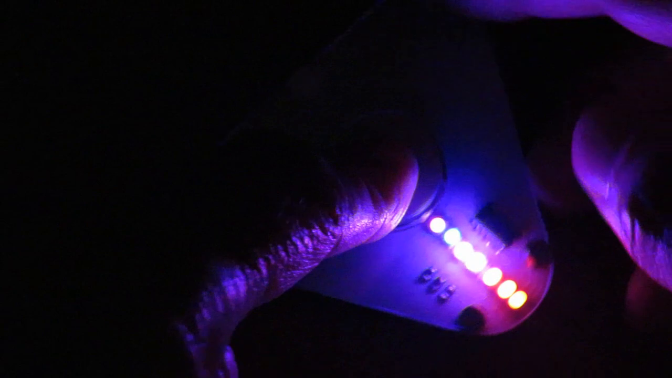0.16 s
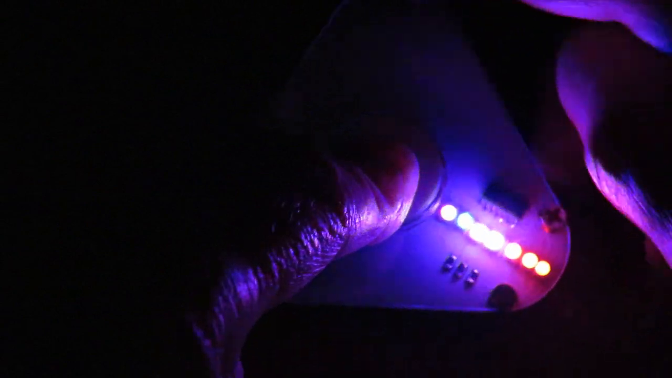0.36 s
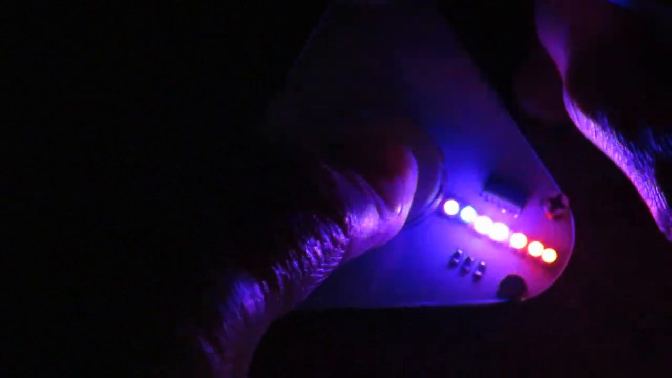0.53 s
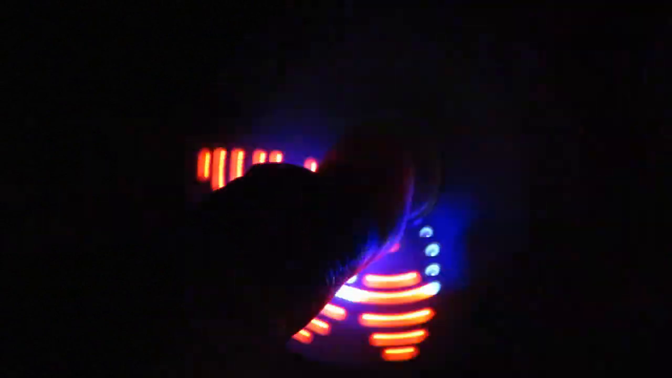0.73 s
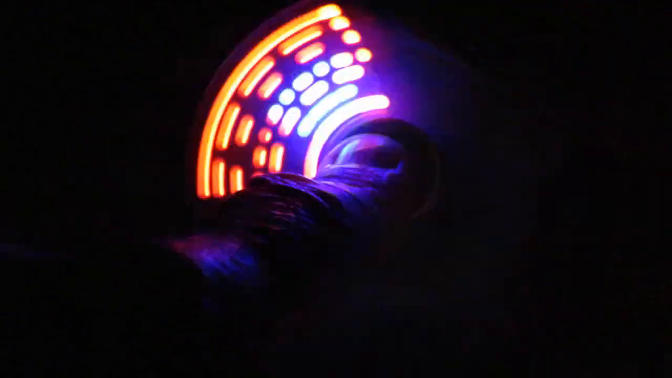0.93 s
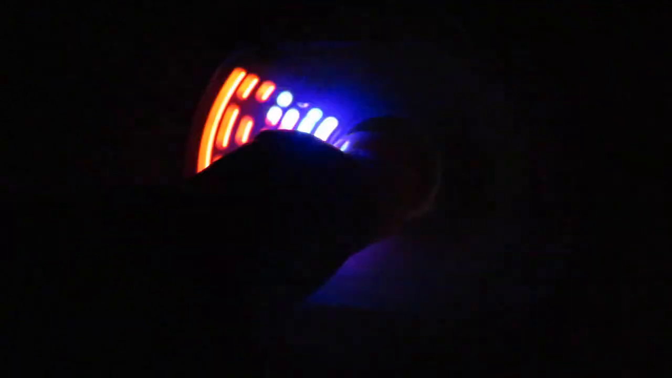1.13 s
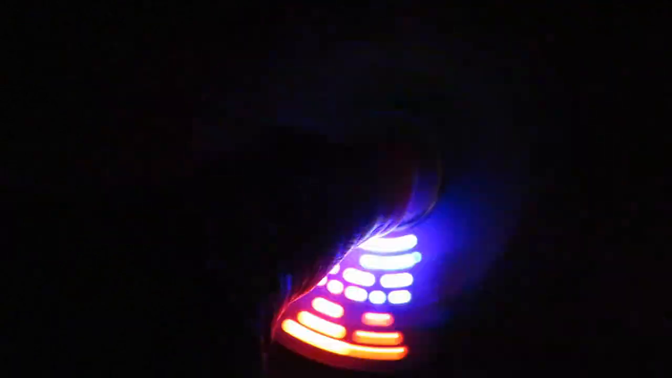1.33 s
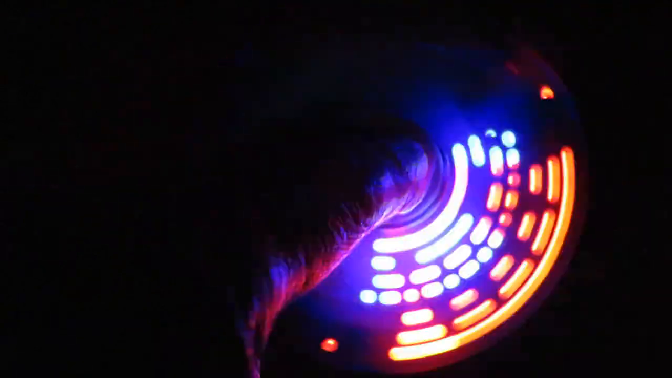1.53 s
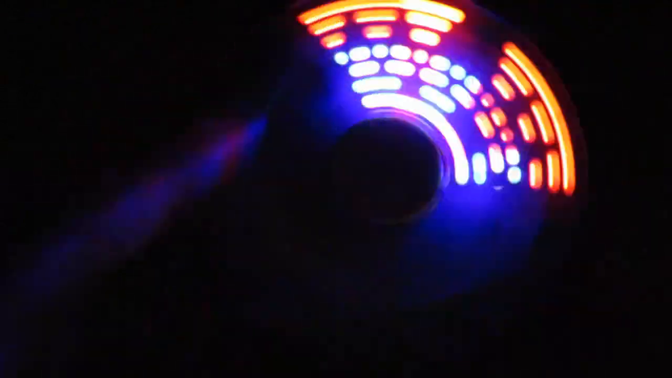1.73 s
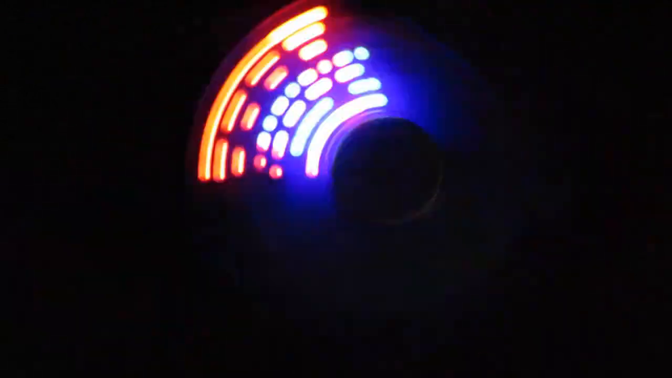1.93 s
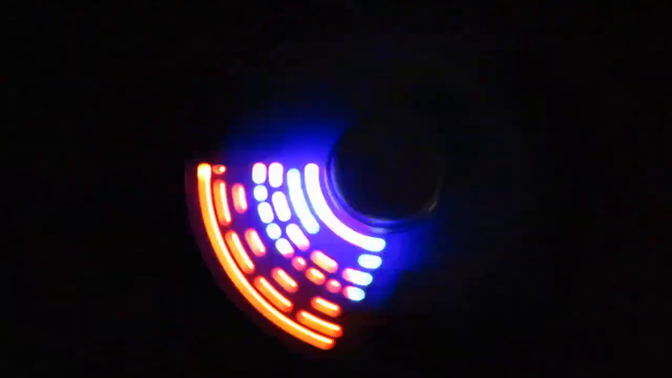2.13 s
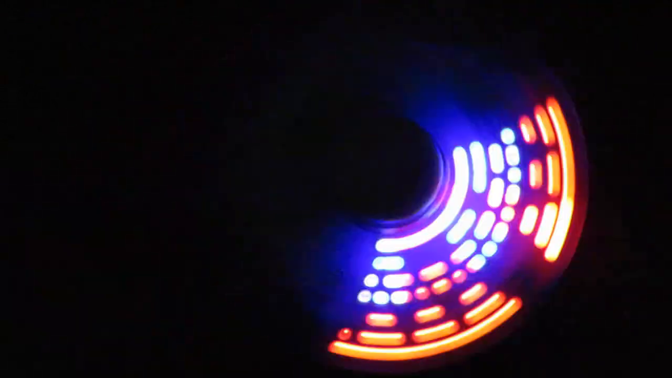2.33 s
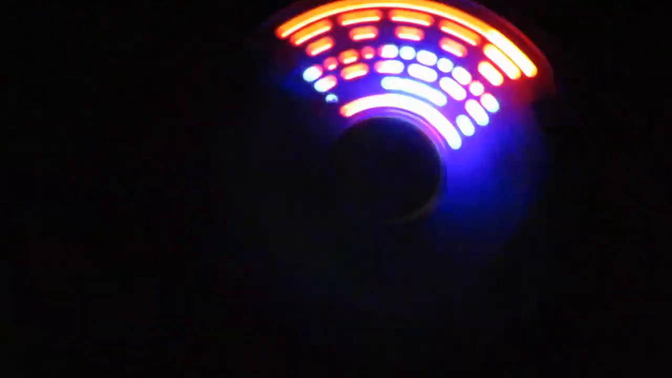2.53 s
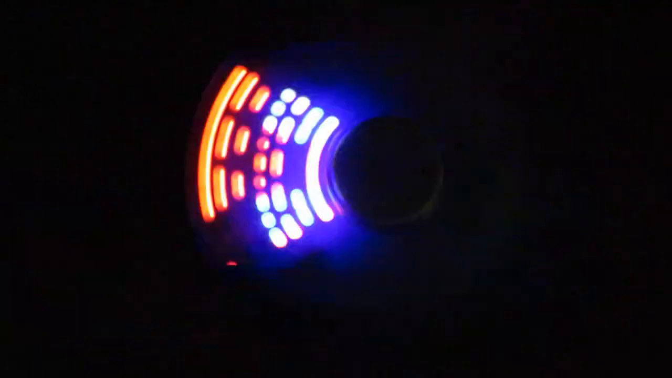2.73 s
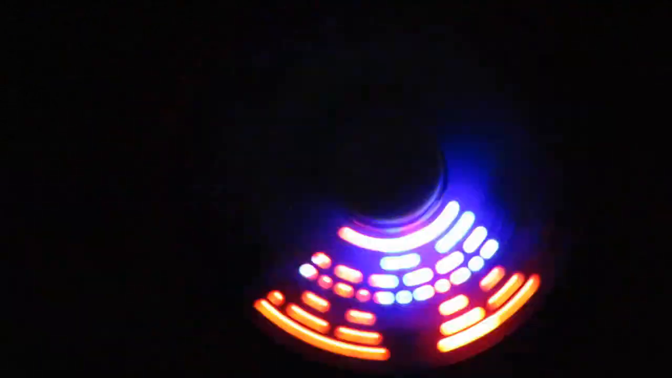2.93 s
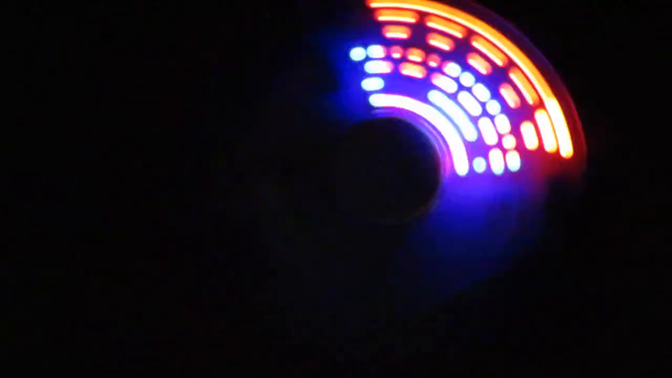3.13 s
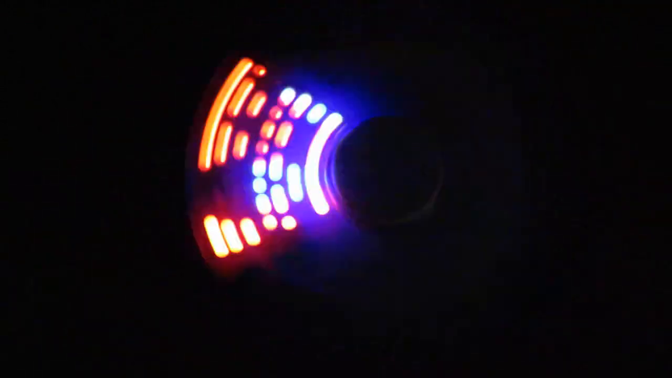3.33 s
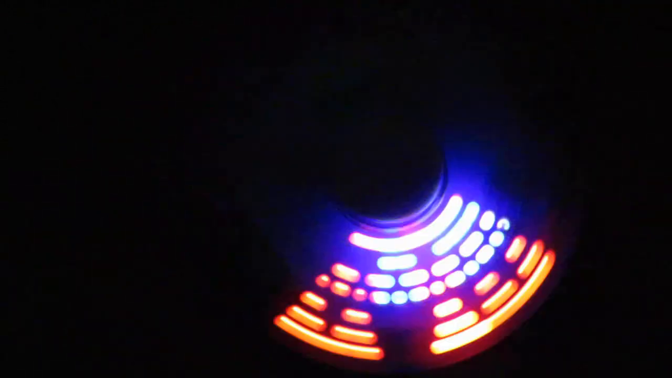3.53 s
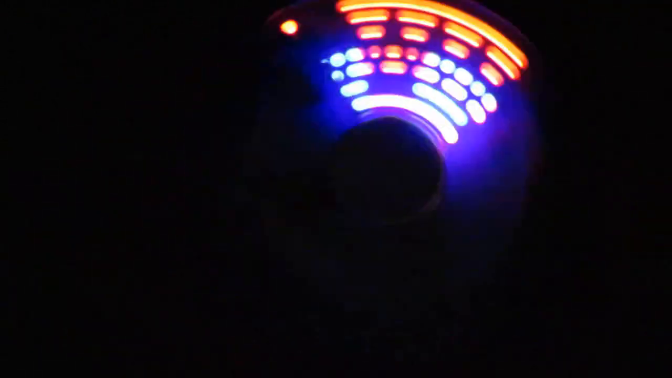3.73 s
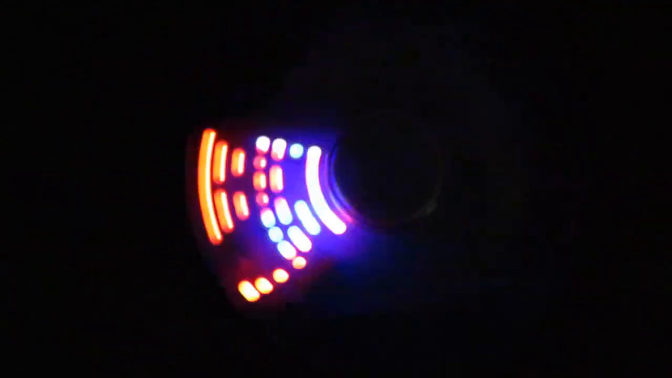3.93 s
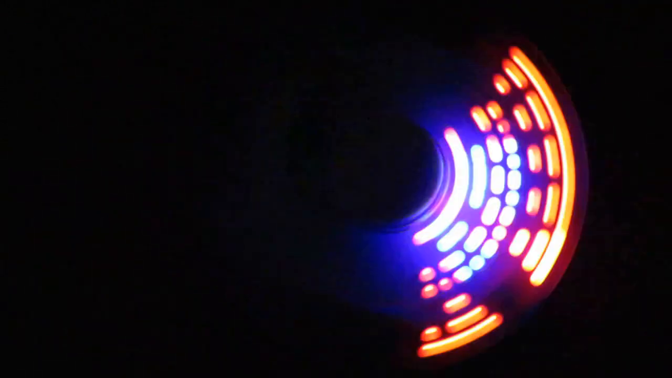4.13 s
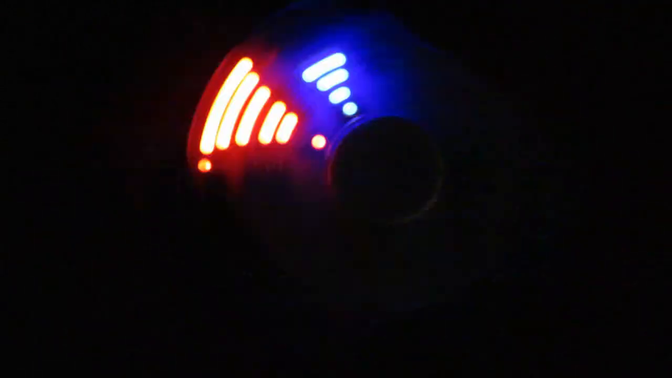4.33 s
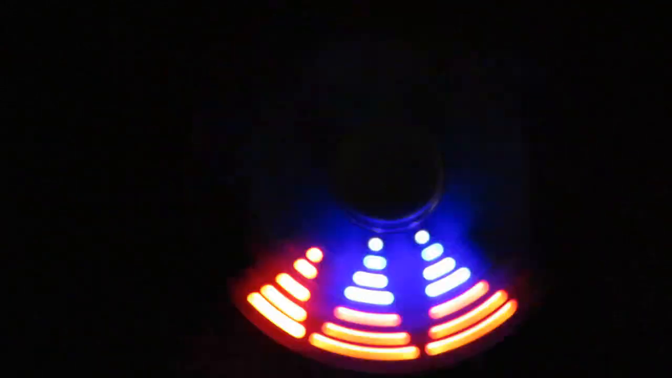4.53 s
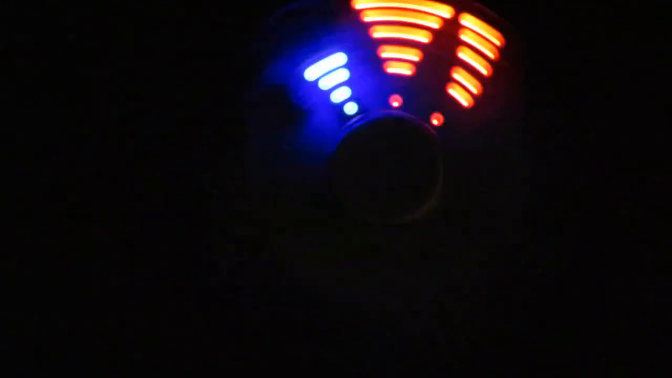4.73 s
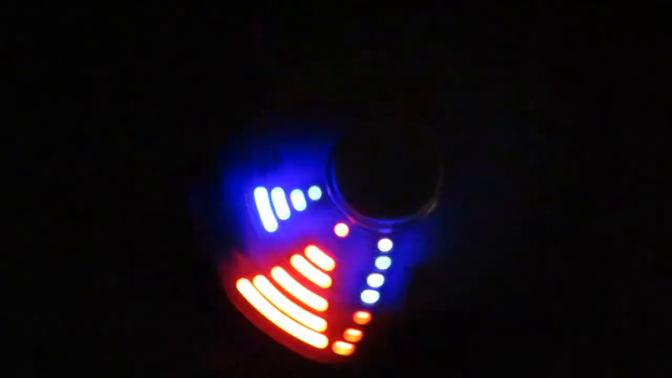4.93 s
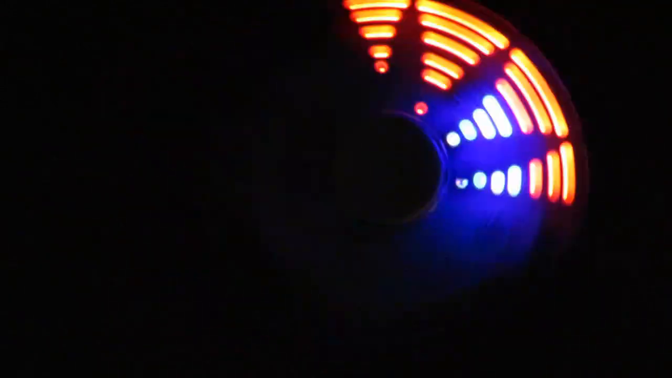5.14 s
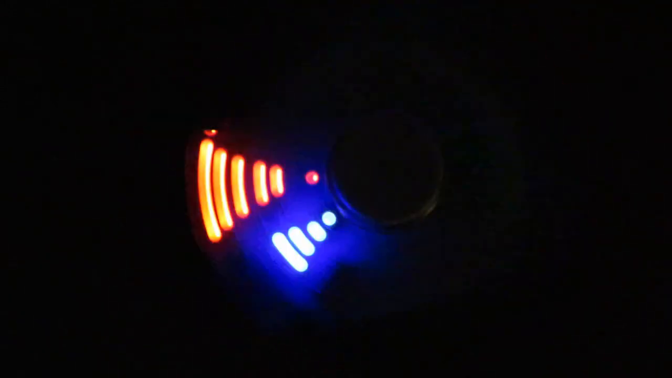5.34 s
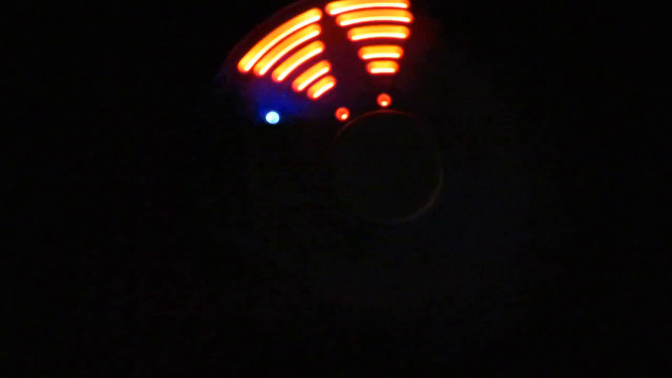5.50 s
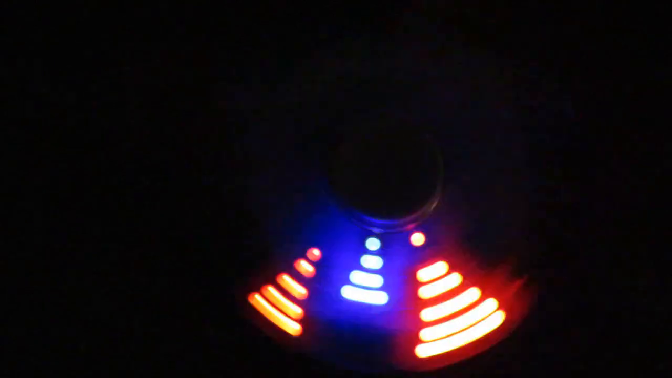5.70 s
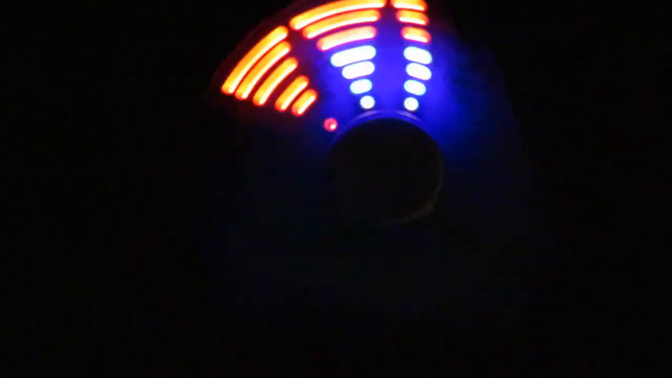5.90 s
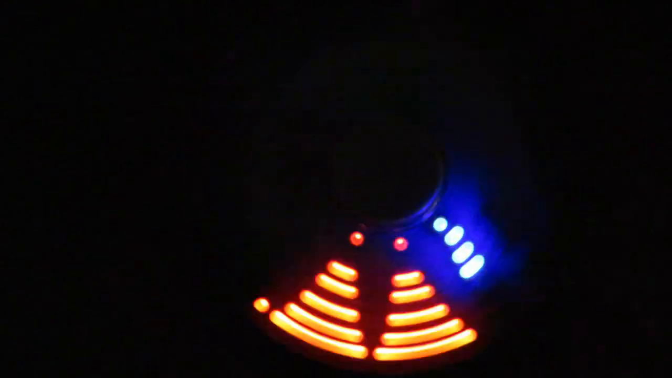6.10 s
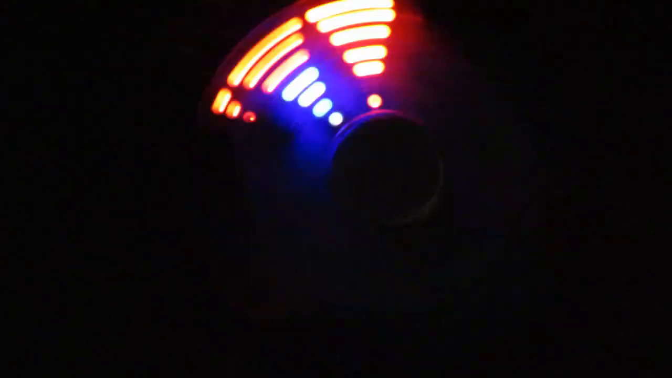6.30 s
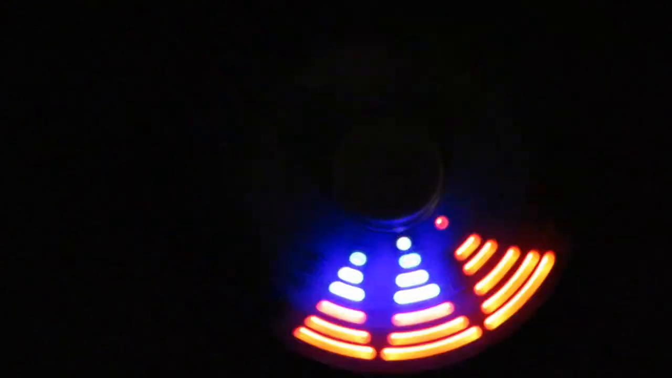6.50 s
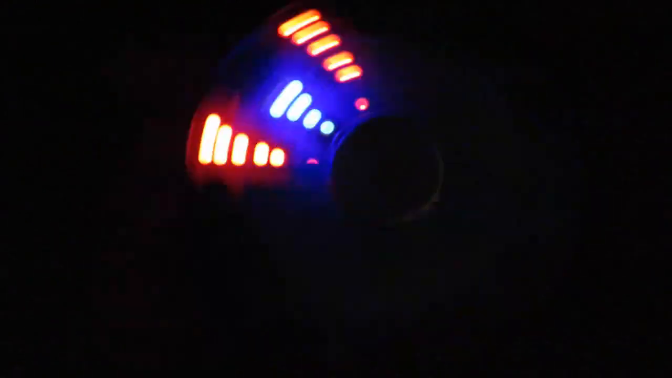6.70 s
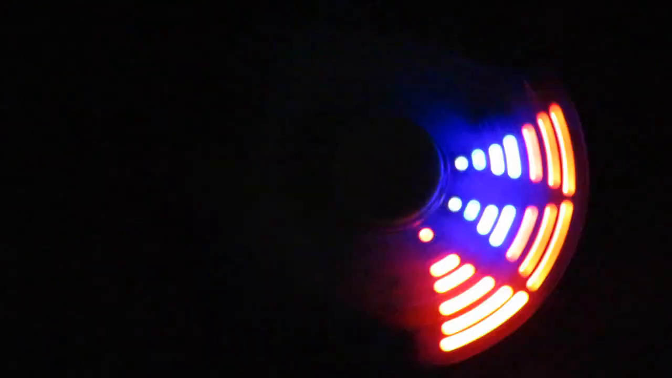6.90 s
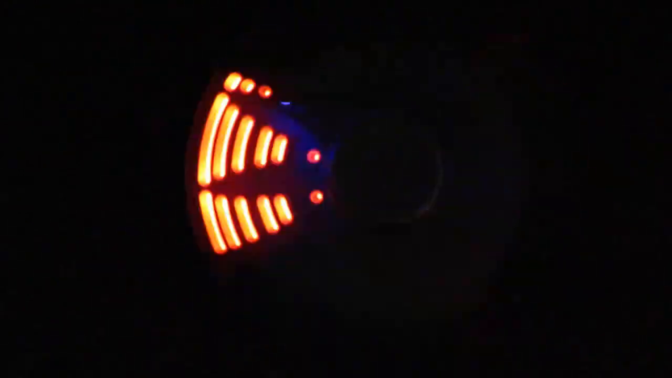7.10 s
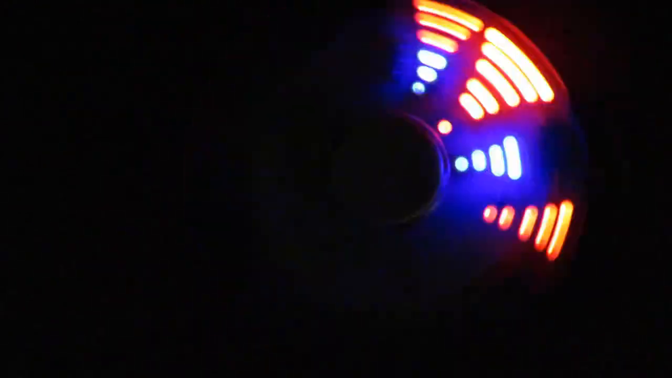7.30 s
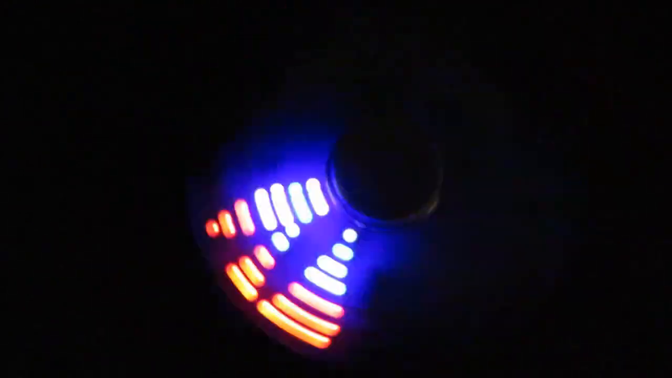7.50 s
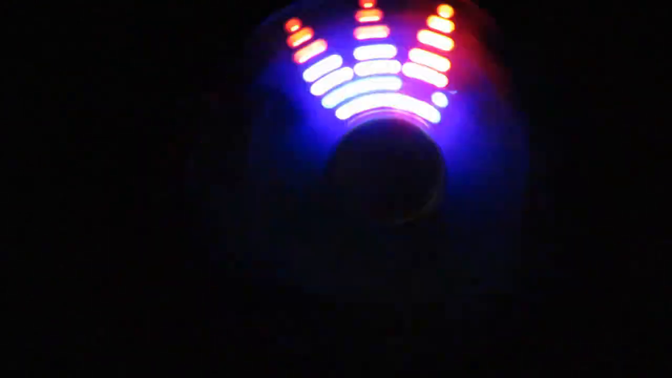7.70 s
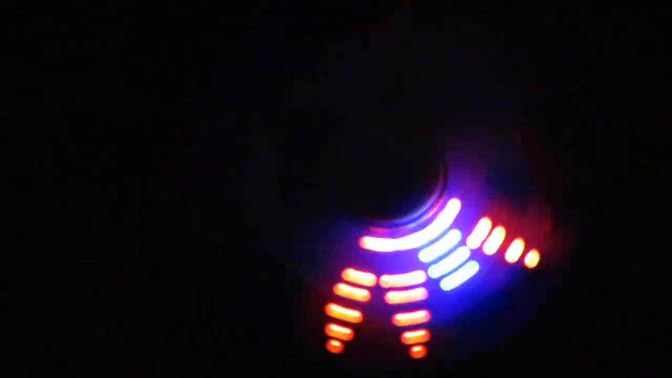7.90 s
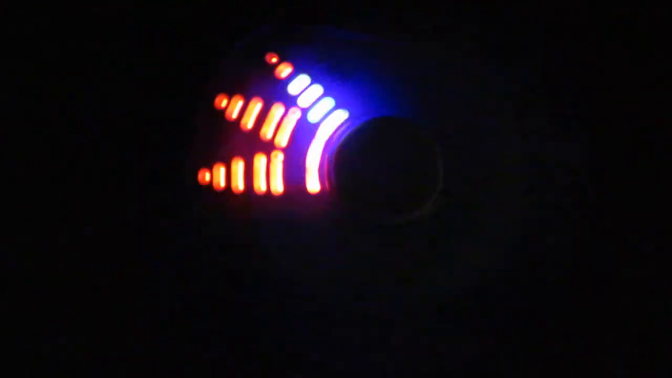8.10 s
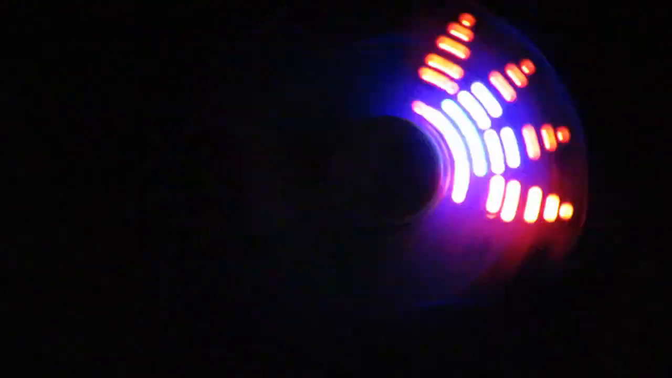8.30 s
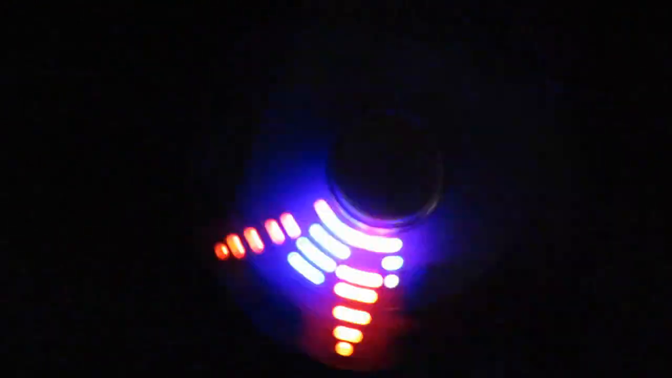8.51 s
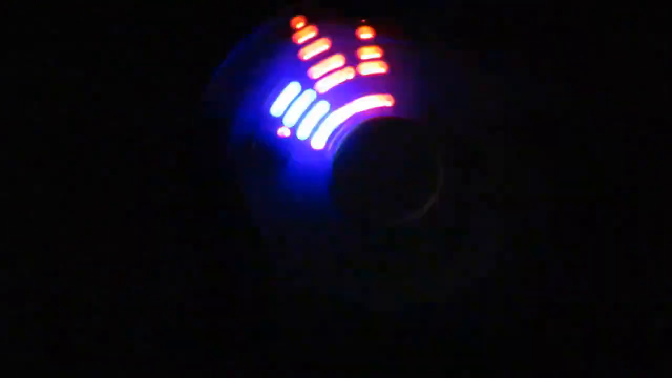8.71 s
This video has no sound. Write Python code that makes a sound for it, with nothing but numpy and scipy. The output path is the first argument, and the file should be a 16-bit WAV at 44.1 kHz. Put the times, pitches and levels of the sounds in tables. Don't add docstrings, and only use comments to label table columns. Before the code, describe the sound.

After almost a second of faint room hum, a fingernail flicks a light bearing spinner, which rattles and whirs steadily with tiny clicks, gradually fading.

```python
import sys
import numpy as np
from scipy import signal
from scipy.fft import rfft, irfft
from scipy.io import wavfile

SR = 44100
rng = np.random.default_rng(int(sys.argv[2]) if len(sys.argv) > 2 else 0)


def dump(signal):
    limited = np.clip(np.atleast_2d(signal).T, -1, 1)
    pcm = np.round(limited * 32767).astype(np.int16)
    wavfile.write(sys.argv[1], SR, pcm)


def attenuation_scalar(level_db):
    decades = np.asarray(level_db, float) / 20
    return 10 ** decades


N = 385875
T = np.arange(N) / SR
HZ = np.maximum(np.fft.rfftfreq(N, 1 / SR), 1)

# frequency in Hz, level in dB per Hz.
RUMBLE = [(12, -37), (20, -10), (54, -6.5), (76, -5), (107, -1), (200, -0.5), (260, -19), (440, -120)]
# frequency in Hz, level in dB per Hz.
ROOM_AIR = [(120, -29), (200, -12.5), (320, -11.5), (440, -18), (700, -8.5), (900, -15.5), (1400, -18.5),
            (2500, -24), (5000, -30.5), (8000, -37), (12500, -41.5), (13200, -46), (15300, -41)]
# frequency in Hz, width in Hz, level in dB.
DUCT = [(245, 26, -8), (444, 35, 1.5), (678, 12, -22), (860, 35, -12), (1031, 35, -12), (1313, 44, -13)]
# frequency in Hz, level in dB per Hz.
SIDE_HISS = [(30, -54), (100, -15.5), (200, -5), (450, -1.5), (800, -10), (1300, -8.5), (3000, -21),
             (7000, -31), (12500, -40)]
# centre in seconds, width in seconds, level in dB.
DRONE_SWELLS = [
    (0.38, 0.15, -76),
    (1.45, 0.095, -78),
    (3.1, 0.31, -74),
    (7.2, 0.068, -84),
]
# centre in seconds, width in seconds, level in dB.
OVERTONE_SWELLS = [
    (0.3, 0.12, -78),
    (4.35, 0.15, -79.5),
    (6.75, 0.07, -79),
    (8.1, 0.27, -85),
]
# centre in seconds, width in seconds, level in dB.
HUM_SWELLS = [
    (0.7, 0.21, -84),
    (5.3, 0.27, -84),
    (8.0, 0.17, -81),
    (8.68, 0.078, -77),
]
# centre in seconds, width in seconds, level in dB.
DRAUGHT = [
    (0.84, 0.38, -79.5),
]
# time in seconds, level in dB.
SPIN = [(0.83, -94), (0.868, -73), (0.88, -57.5), (0.903, -52), (0.913, -44.5), (0.94, -49), (1.02, -47),
        (1.2, -49.5), (1.45, -47.5), (2.0, -48.5), (4.2, -50), (6.0, -51.5), (8.75, -53.5)]
# time in seconds, share from 0 to 1.
GRIP = [
    (0, 1),
    (1.635, 0.79),
    (1.66, 0.4),
    (1.84, 0.2),
    (1.9, 0.01),
]
# frequency in Hz, width in Hz, level in dB.
BOARD = [(1083, 56, -19.5), (1137, 33, -21), (1237, 42, -21.5), (1600, 125, -9.5), (1712, 70, -1),
         (1853, 72, 1.5), (1965, 127, 0.5), (2107, 110, -1), (2273, 130, -0.5), (2384, 140, -4.5),
         (2533, 104, -5.5), (2667, 107, -9.5)]
# frequency in Hz, width in Hz, level in dB.
GRIPPED_BOARD = [(1570, 54, -19), (1714, 76, 4.5), (1854, 240, -1.5), (1990, 260, -0.5), (2310, 180, 3),
                 (2510, 160, -7.5), (2570, 140, -1.5)]
# frequency in Hz, width in Hz, level in dB.
RACES = [(2974, 395, -2.5), (3076, 126, -2), (3307, 260, -3), (3588, 146, -4), (3804, 225, -2),
         (3956, 208, -1), (4367, 420, -5), (4865, 420, -10), (5260, 200, -7.5), (5990, 540, -13.5),
         (6323, 227, -8), (6730, 270, -15), (7100, 460, -25), (7820, 250, -25), (8700, 450, -41),
         (9640, 350, -28.5), (10200, 230, -23), (10880, 330, -31), (11350, 490, -36.5), (12900, 710, -40)]
# frequency in Hz, width in Hz, level in dB.
PINCHED = [(1207, 150, -11), (1357, 64, -3.5), (1414, 71, -0.5), (1527, 64, -1)]
# frequency in Hz, width in Hz, level in dB.
FINGERS = [(489, 110, -8.5), (615, 147, 3), (842, 310, 3.5), (1065, 220, 3)]
# time in seconds, peak in dB, brightness in dB.
NAIL_KNOCKS = [(0.8787, -42, -4), (0.903, -36, 1), (0.9066, -36, -7), (0.9109, -22.5, -4),
               (0.9264, -43, -13), (0.9457, -28.5, -2), (0.9662, -29, -17), (0.9755, -28, -21),
               (0.9804, -34, -18), (1.0048, -37, -12), (1.0316, -32, -3), (1.053, -36, -15),
               (1.069, -34, -13), (1.1584, -34, -12), (1.188, -33, -6)]
# frequency in Hz, level in dB per Hz.
SCRAPE = [(2500, -21), (5000, 10), (7500, -1), (9500, -6.5), (12000, -12), (14000, -24), (16000, -24)]
# frequency in Hz, width in Hz, level in dB.
THUD = [(139, 65, -1), (197, 79, -2), (250, 11, 4.5), (319, 72, 3.5)]
# centre in seconds, width in seconds, level in dB.
PRESSES = [
    (0.945, 0.025, -52),
    (0.995, 0.02, -59),
    (1.59, 0.033, -58),
]
# frequency in Hz, width in Hz, level in dB.
FINGER_PADS = [(502, 130, -5), (600, 56, 5), (726, 170, -5)]
# time in seconds, peak in dB.
BALL_KNOCKS = [(1.9582, -35), (2.1194, -30), (2.3647, -22), (2.722, -22), (3.0722, -24), (3.1618, -18),
               (3.3431, -23), (3.5835, -30), (4.1501, -18), (4.2028, -15.5), (4.275, -28), (5.0188, -24),
               (5.2219, -20.5), (5.348, -23), (5.383, -22), (6.1375, -21), (6.902, -23), (7.39, -23),
               (7.1180, -23)]
# frequency in Hz, level in dB.
SIDE_SHARE = [(300, -15), (1000, -9.5), (1800, -23), (2300, -17), (3000, -17.5), (4200, -16), (5500, -9),
              (7000, -9), (8500, -10), (10500, -7), (13000, -1)]

RELEASE_S = 0.914


def rms_one(x):
    return x / np.sqrt(np.mean(x ** 2) + 1e-20)


def in_time(rows, silent_db=-120):
    s, *columns = np.transpose(rows)
    return [attenuation_scalar(np.interp(T, s, c, silent_db, silent_db)) for c in columns]


def swells(rows):
    return sum(attenuation_scalar(level_db) * np.exp(-.5 * ((T - s) / width_s) ** 2) for s, width_s, level_db in rows)


def blow(level_db, rise_db_per_s, fall_db_per_s):
    late_s = T - RELEASE_S
    slope = np.where(late_s < 0, -rise_db_per_s, fall_db_per_s)
    return attenuation_scalar(level_db - slope * late_s)


def colour(x, points):
    hz, level_db = np.transpose(points)
    gain = attenuation_scalar(np.interp(np.log(HZ), np.log(hz), level_db))
    return irfft(rfft(x) * gain, N)


def noise(points):
    return rms_one(colour(rng.standard_normal(N), points))


def drift(rate):
    r = np.exp(-80 * np.pi * rate / SR)
    start = rng.standard_normal(N // 40 + 2002)
    slow = signal.lfilter([1], [1, -2 * r, r * r], start)[2000:]
    return np.interp(np.arange(N) / 40, np.arange(len(slow)), rms_one(slow))


def resonate(x, hz, width_hz):
    r = np.exp(-np.pi * width_hz * 1.55 / SR)
    turn = 2 * np.pi * hz / SR
    section = [(1 - r * r) / 2, 0, (r * r - 1) / 2, 1, -2 * r * np.cos(turn), r * r]
    return signal.sosfilt([section, section], x + 1e-18)


def tone(hz, width_hz):
    return rms_one(resonate(rng.standard_normal(N), hz, width_hz))


def body(force, modes, flicker_db):
    hz, width_hz, level_db = np.transpose(modes)
    passed = np.sum(attenuation_scalar(2 * level_db) * width_hz * 2.44 / SR)
    out, n = np.zeros(N), len(force)
    for k in range(len(modes)):
        load = attenuation_scalar(level_db[k] + flicker_db * drift(21.3)[:n])
        strengths = rng.standard_normal(n) * load
        out[:n] += resonate(force * strengths, hz[k], width_hz[k])
    return out / np.sqrt(passed)


def room_air():
    whistle = attenuation_scalar(-72.5 + 1.5 * drift(13.0)) * tone(585.5, 16)
    rumble = (attenuation_scalar(-76 + 0.8 * drift(2.2)) + swells(DRAUGHT)) * noise(RUMBLE)
    hum = (attenuation_scalar(-82.5) + swells(HUM_SWELLS)) * tone(59, 7.1)
    drone = (attenuation_scalar(-86.5) + swells(DRONE_SWELLS)) * tone(104.2, 9)
    overtone = (attenuation_scalar(-87.5) + swells(OVERTONE_SWELLS)) * tone(154, 9.2)
    broad = attenuation_scalar(-71.5) * noise(ROOM_AIR)
    duct = attenuation_scalar(-70) * rms_one(body(np.ones(N), DUCT, flicker_db=2.3))
    mid = rumble + hum + drone + overtone + broad + duct + attenuation_scalar(0.4) * whistle
    side = attenuation_scalar(-67.5) * noise(SIDE_HISS) + attenuation_scalar(2.5) * whistle + attenuation_scalar(-76) * tone(746, 22)
    return mid, side


def finger_brush():
    level_db, fall_db_per_s = -73.5, 87
    return attenuation_scalar(level_db - fall_db_per_s * np.abs(T - 0.04))


def ball_contacts(per_s, spread_db, swell_db):
    sizes = attenuation_scalar(spread_db * np.minimum(rng.exponential(1, N), 5))
    hits = rng.random(N) < per_s / SR
    return sizes * hits * attenuation_scalar(swell_db * (drift(8.9) + 0.54 * drift(51)))


def knocks():
    dull, bright = np.zeros((2, N))
    for s, peak_db, bright_db in NAIL_KNOCKS:
        i = int(s * SR)
        dull[i] = attenuation_scalar(peak_db - 12.0)
        bright[i] = attenuation_scalar(peak_db + bright_db + 8.5)
    for s, peak_db in BALL_KNOCKS:
        i = int(s * SR)
        dull[i] = attenuation_scalar(peak_db)
        bright[i] = attenuation_scalar(-43.5 + 6.5)
    ticks_per_s, tick_db = 2.5, -45
    ticks = (rng.random(N) < ticks_per_s / SR) * (T > 2)
    bright += ticks * attenuation_scalar(tick_db + 10 + 3 * rng.standard_normal(N))
    spread = np.exp(-np.arange(120) / 7.4)
    return np.convolve(dull, spread)[:N], np.convolve(bright, spread)[:N]


def flick(contacts, bright):
    scrape = blow(-48.5, rise_db_per_s=800, fall_db_per_s=70.5)
    scrape += blow(-68.5, rise_db_per_s=800, fall_db_per_s=1.5)
    grit = rms_one(colour(contacts * rng.standard_normal(N), SCRAPE))
    snap = colour(bright * (T < 1.0) * rng.standard_normal(N), SCRAPE)
    thud = blow(-54, rise_db_per_s=902, fall_db_per_s=62)
    thud += attenuation_scalar(-75.5) * (T > RELEASE_S) * (T < 1.72)
    return scrape * grit + attenuation_scalar(-10) * snap + body(thud[:2 * SR], THUD, flicker_db=1.0)


def rocking_in_pinch():
    first_s, turn_s, width_s = 0.97, 0.093, 0.012
    level_db, loss_db = -42, 0.95
    rocks = [(first_s + turn_s * k, width_s, level_db - loss_db * k * k) for k in range(4)]
    return swells(rocks + [(RELEASE_S, 0.008, -45)])


def spinner():
    force, = in_time(SPIN)
    grip = np.clip(np.interp(T, *np.transpose(GRIP)), 0, 1)
    brush = finger_brush()
    contacts = rms_one(ball_contacts(per_s=7000, spread_db=2.5, swell_db=0.41))
    dull, bright = knocks()
    rocking = rocking_in_pinch()

    board_db = 7 + 0.2042 * T - 9.0 * grip + 0.15 * drift(11.0)
    board = force * attenuation_scalar(board_db) + attenuation_scalar(-7.5) * rocking
    on_board = (board + 1.15 * brush) * contacts + dull
    on_races = (force + 0.64 * brush) * contacts + bright
    pinched = force * attenuation_scalar(-9 + 1.5 * drift(7.0)) + rocking
    shake = blow(-60, rise_db_per_s=900, fall_db_per_s=26)
    fingers = force * attenuation_scalar(-13 + 1.5 * drift(3.4)) + attenuation_scalar(-17) * rocking + shake

    early = slice(0, 2 * SR)
    out = body(np.sqrt(1 - grip) * on_board, BOARD, flicker_db=0.62)
    out += body((np.sqrt(grip) * on_board)[early], GRIPPED_BOARD, flicker_db=3.5)
    out += body(on_races, RACES, flicker_db=1.58)
    out += body(pinched * attenuation_scalar(-1.9) * contacts, PINCHED, flicker_db=1.6)
    out += body(fingers * attenuation_scalar(-2.0) * contacts, FINGERS, flicker_db=1.7)
    out += body((swells(PRESSES) * contacts)[early], FINGER_PADS, flicker_db=-0.5)
    return out + flick(contacts, bright)


def walls(x, t60, delay_s):
    t = T[:int(.4 * SR)]
    tail = rng.standard_normal(len(t)) * attenuation_scalar(-60 * t / t60) * (t > delay_s)
    return signal.fftconvolve(x, tail / np.sqrt(np.sum(tail ** 2)))[:N]


def scene():
    air_mid, air_side = room_air()
    near = spinner()
    heard = near + attenuation_scalar(-8.5) * walls(near, t60=0.39, delay_s=0.0045)
    mid = heard + air_mid
    wander = np.exp(3.5j * drift(9.5))
    sideways = colour(np.real(signal.hilbert(heard) * wander), SIDE_SHARE)
    side = sideways + air_side + attenuation_scalar(-24) * air_mid
    return np.array([mid + side, mid - side])


def low_pass(x):
    return signal.sosfilt(signal.butter(12, 15700, fs=SR, output="sos"), x)


def record(dry):
    soft = signal.sosfilt(signal.butter(2, 15000, fs=SR, output="sos"), dry)
    return low_pass(soft)


dry = scene()
out = record(dry)
dump(out)
```